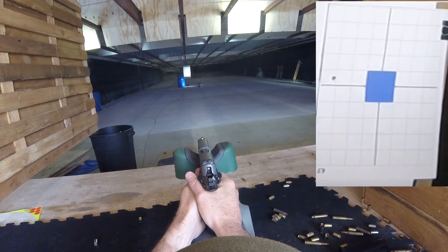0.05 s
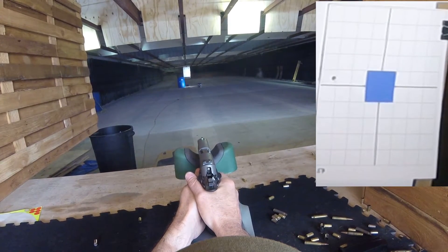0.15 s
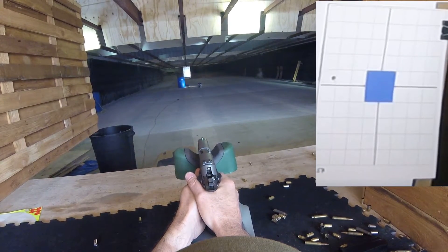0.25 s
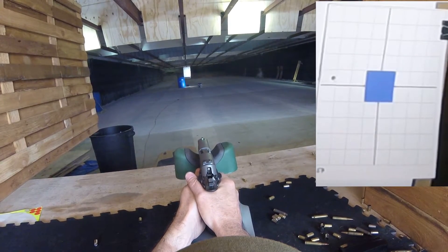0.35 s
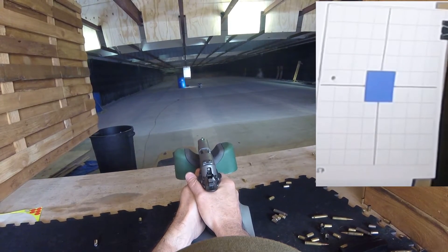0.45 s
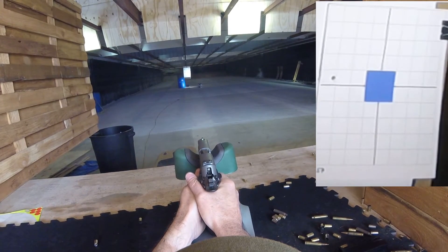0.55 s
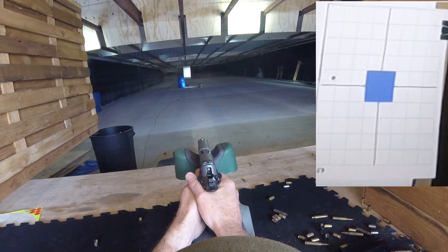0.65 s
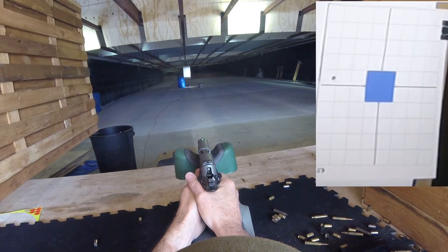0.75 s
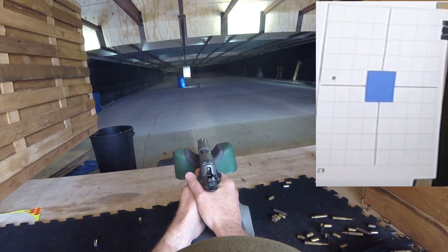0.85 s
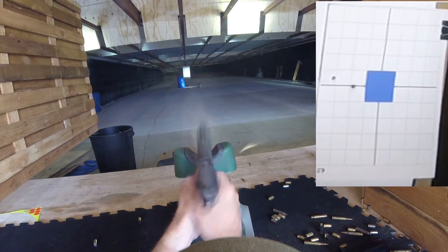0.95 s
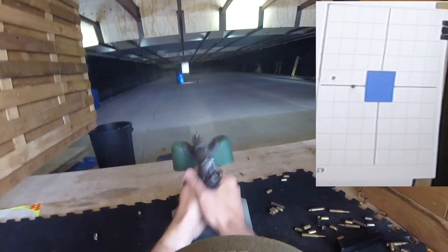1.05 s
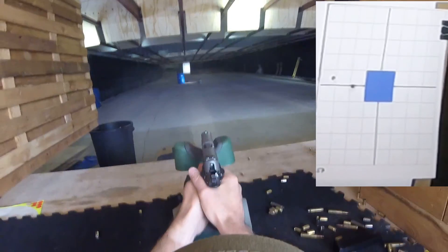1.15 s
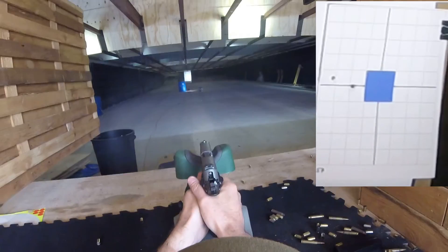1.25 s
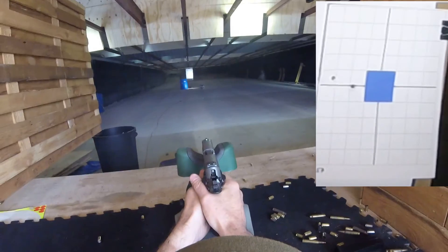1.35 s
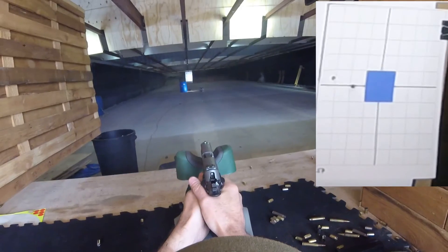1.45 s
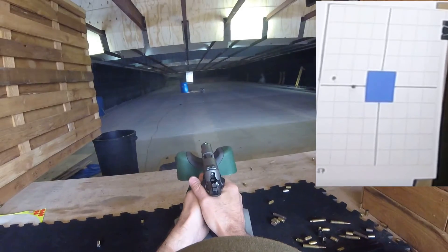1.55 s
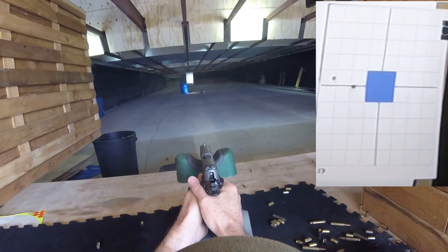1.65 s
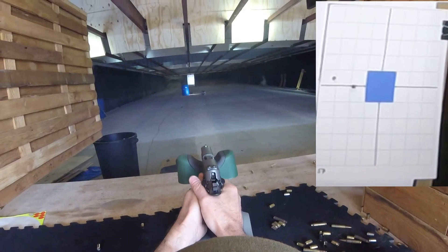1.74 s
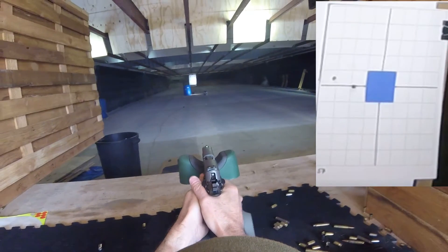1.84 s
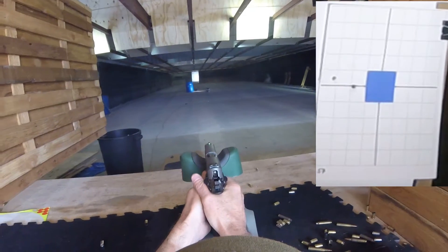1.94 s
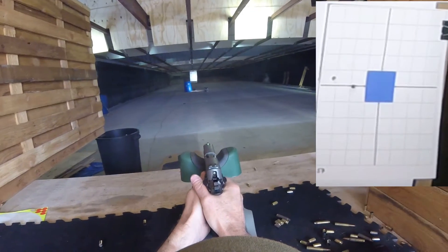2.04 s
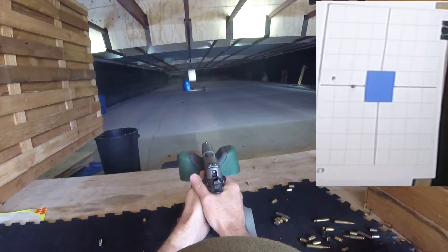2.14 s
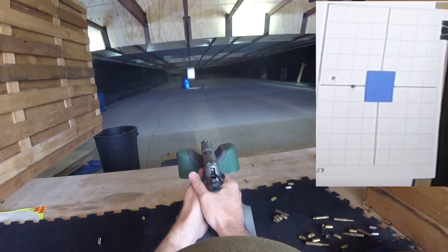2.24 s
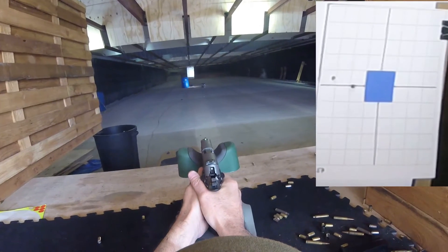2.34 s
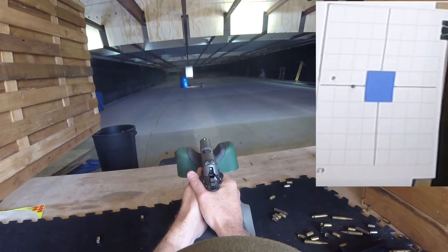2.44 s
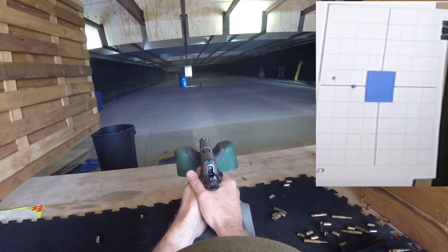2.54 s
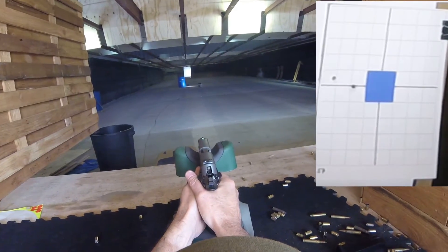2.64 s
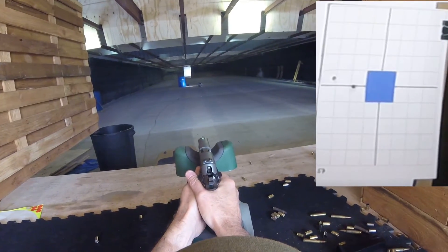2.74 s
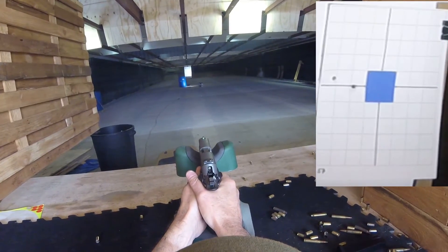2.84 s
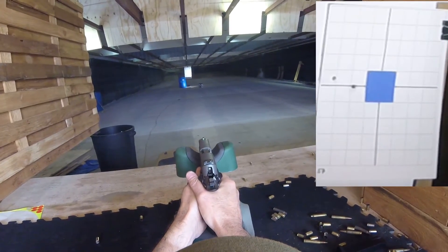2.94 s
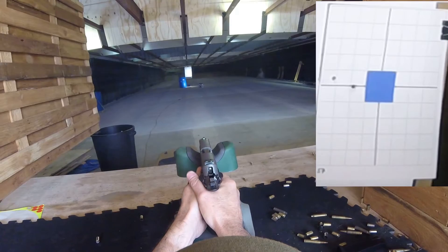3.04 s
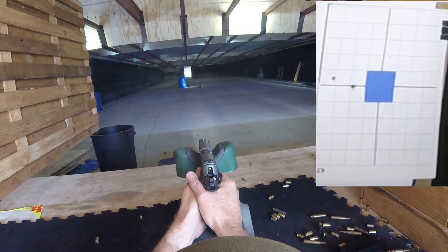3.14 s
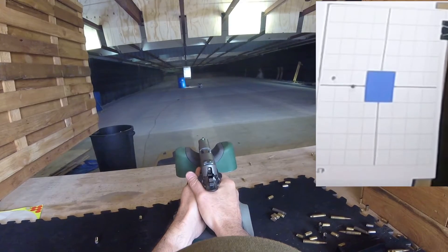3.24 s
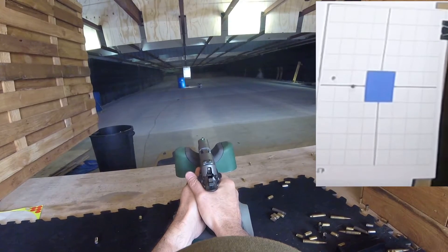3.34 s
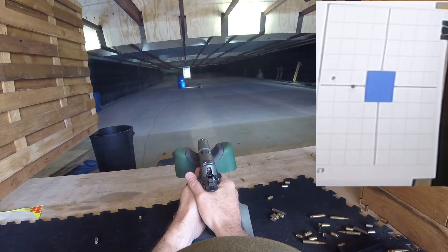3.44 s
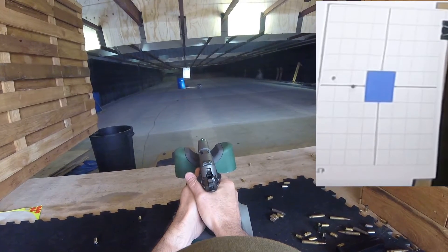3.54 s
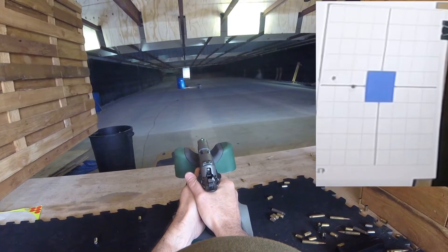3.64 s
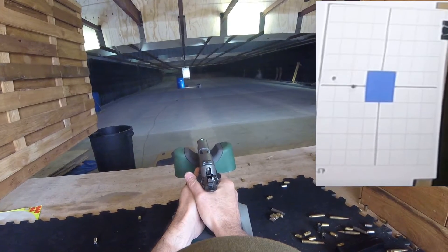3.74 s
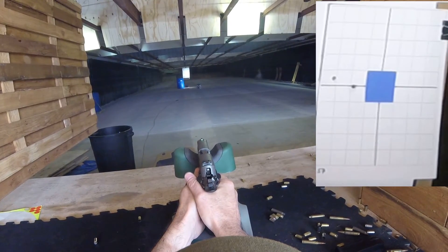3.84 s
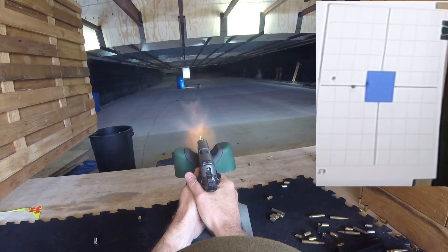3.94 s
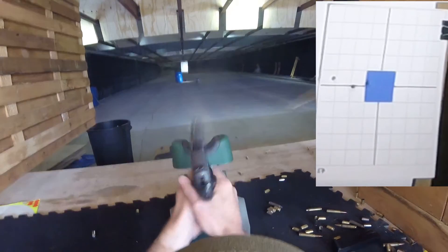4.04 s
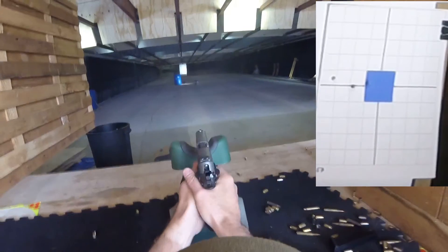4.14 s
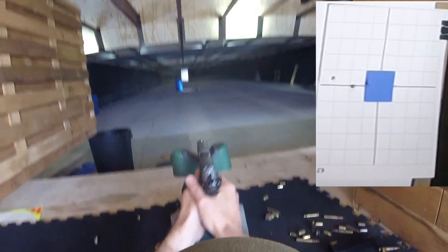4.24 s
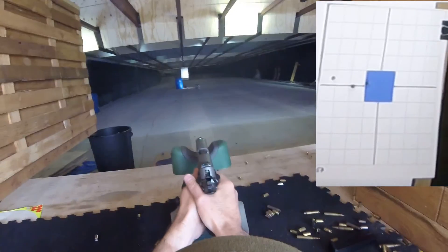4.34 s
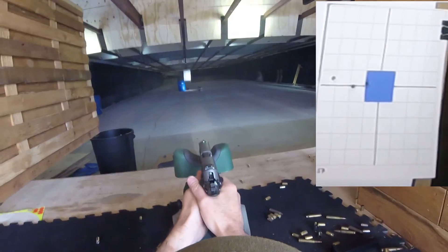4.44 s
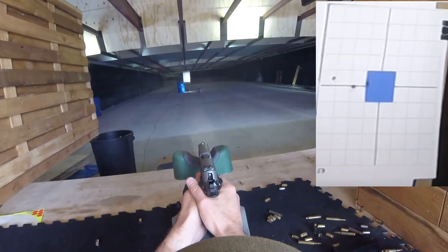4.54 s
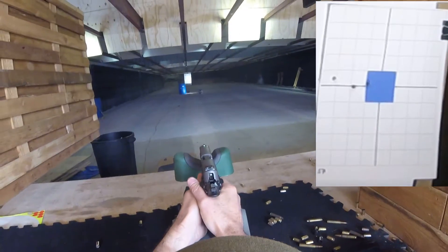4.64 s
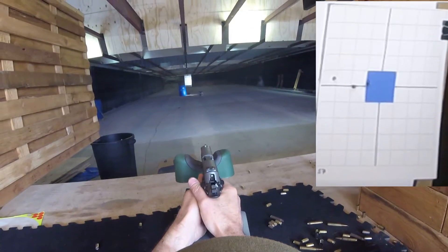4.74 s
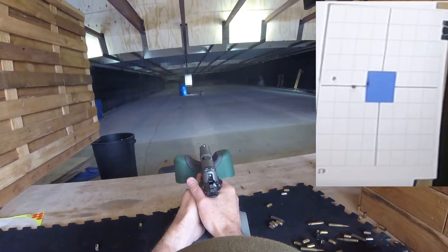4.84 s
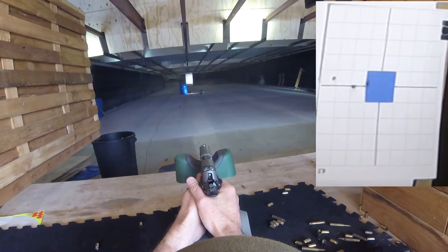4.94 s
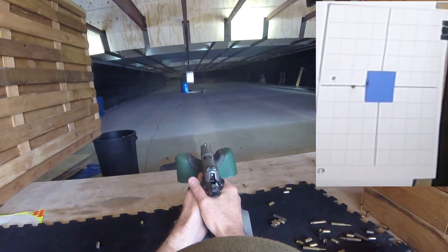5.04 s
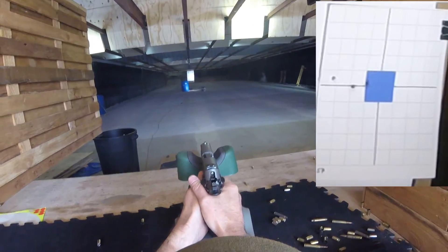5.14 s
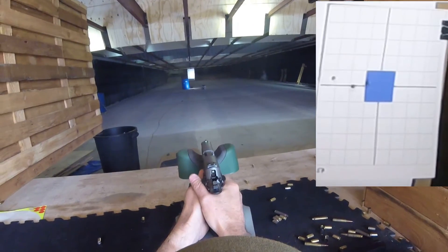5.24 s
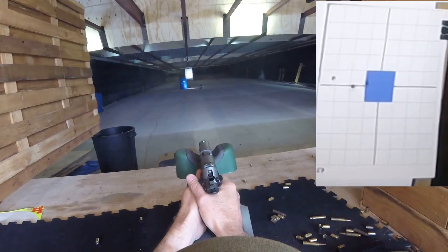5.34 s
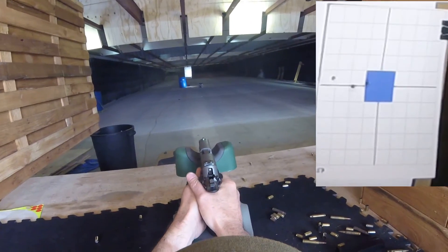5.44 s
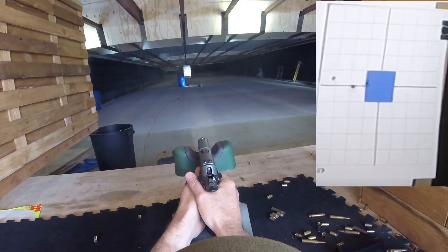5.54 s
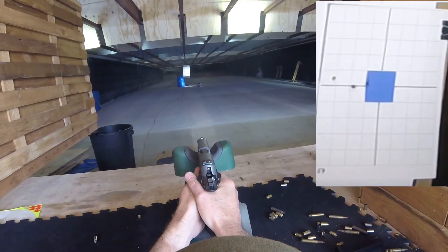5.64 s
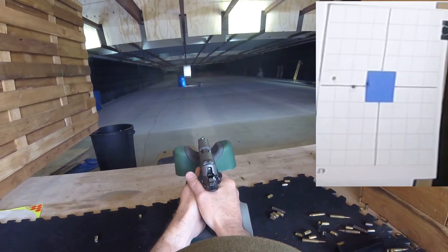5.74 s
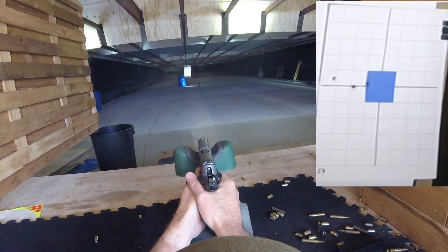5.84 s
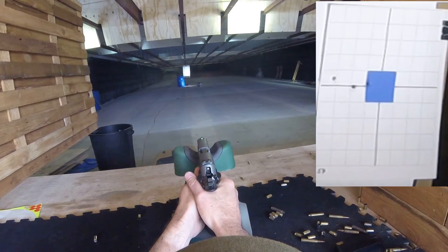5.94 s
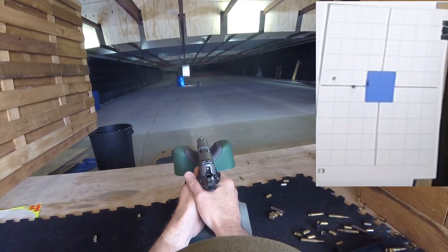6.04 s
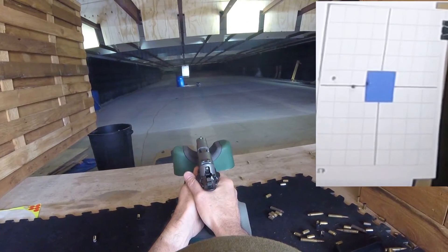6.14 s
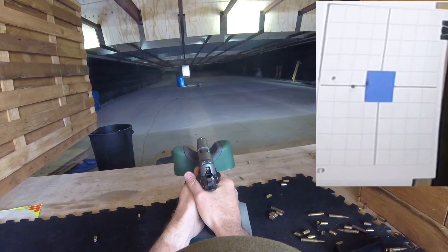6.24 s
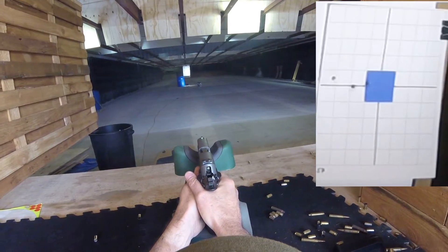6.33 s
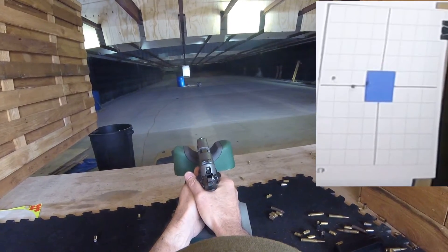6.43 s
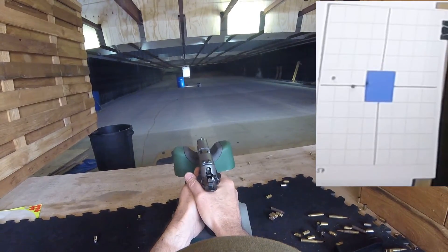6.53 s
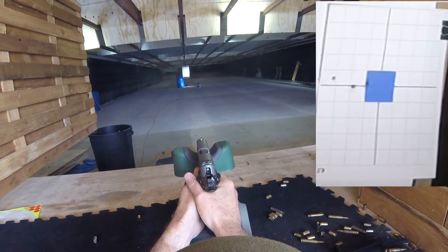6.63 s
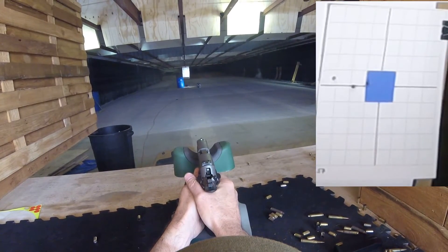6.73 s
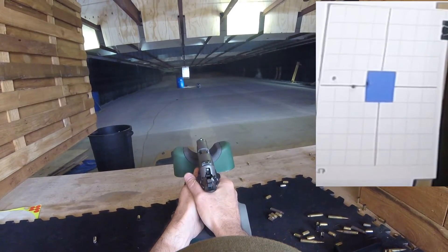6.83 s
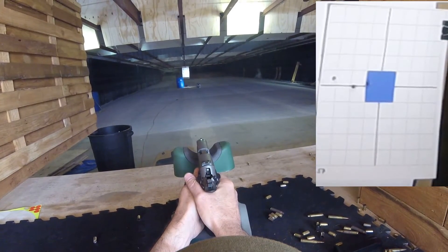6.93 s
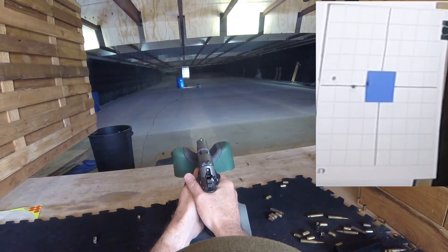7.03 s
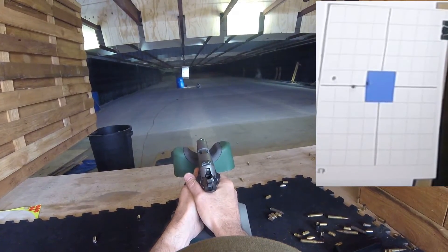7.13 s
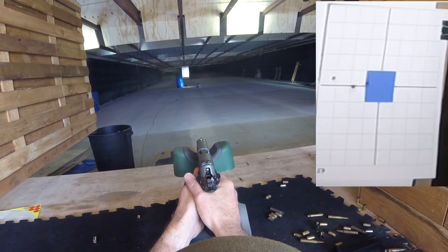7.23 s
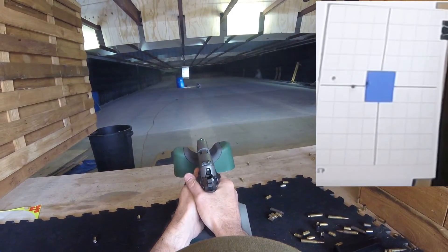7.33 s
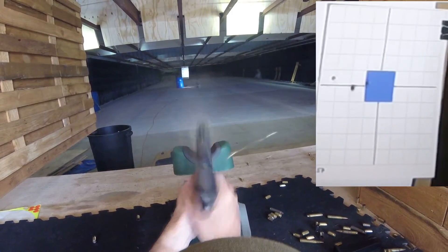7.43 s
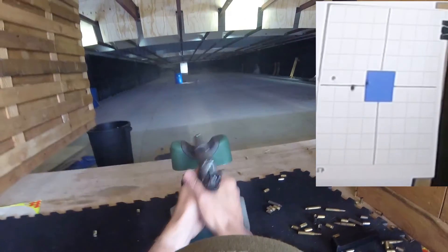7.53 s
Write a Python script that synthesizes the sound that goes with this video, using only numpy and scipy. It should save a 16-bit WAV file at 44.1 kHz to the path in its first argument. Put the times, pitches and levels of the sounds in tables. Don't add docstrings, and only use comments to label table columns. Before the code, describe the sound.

Three spaced pistol shots crack out under a covered range, each with a slide clack, backstop slap and long fading echo over faint wind.

```python
import sys
import numpy as np
from scipy import signal
from scipy.fft import rfft, irfft, next_fast_len
from scipy.io import wavfile
from scipy.ndimage import uniform_filter1d, minimum_filter1d

SR = 44100
rng = np.random.default_rng(int(sys.argv[2]) if len(sys.argv) > 2 else 0)


def gain_from_db(level_db):
    decades = np.asarray(level_db, float) / 20
    return 10 ** decades


def inscribe(sig):
    pcm = np.round(np.clip(np.atleast_2d(sig).T, -1, 1) * 32767)
    wavfile.write(sys.argv[1], SR, pcm.astype(np.int16))


N = 334278

# (time [s], level [dB])
SHOTS = [
    (0.971, -11),
    (4.0112, -11.5),
    (7.4413, -11),
]
# (time [s], fade [s])
MUTES = [
    (.928, .001),
    (3.969, .004),
    (7.393, .008),
]
BANDS_HZ = 25 * 2 ** np.arange(0, 9.3, 1 / 3)
PORT_HZ = 6520


def read(table, hz):
    f, v = np.transpose(table)
    return np.interp(np.log(hz), np.log(f), v)


def bands(x):
    size = next_fast_len(x.shape[-1])
    place = 3 * np.log2(np.maximum(np.fft.rfftfreq(size, 1 / SR), 1) / BANDS_HZ[0])
    spectrum = rfft(x, size)
    for k, hz in enumerate(BANDS_HZ):
        weight = np.cos(np.pi / 2 * np.clip(place - k, -1, 1)) ** 2
        yield hz, irfft(spectrum * weight, size)[..., :x.shape[-1]]


def fade(t, t60):
    return (t >= 0) * gain_from_db(-60 * np.clip(t, 0, 9) / t60)


def peak(x, hz, width_hz):
    return signal.lfilter(*signal.iirpeak(hz, hz / width_hz, SR), x)


def walk(rate):
    points = rng.standard_normal(int(N / SR * 400))[:int(N / SR * rate) + 2]
    return 1.2 * np.interp(np.arange(N) * rate / SR, np.arange(len(points)), points)


def add(out, x, s):
    i = int(s * SR)
    out[i:i + len(x)] += x[:len(out) - i]


def shots():
    same_paths = .95
    out, size = np.zeros(N), next_fast_len(int(2.9 * SR))
    common = same_paths * rng.standard_normal((2, 1, size))
    own = np.sqrt(1 - same_paths ** 2) * rng.standard_normal((2, len(SHOTS), size))
    near, far = common + own
    for (s, db), first, late in zip(SHOTS, near, hall(far)):
        add(out, gain_from_db(db) * blast(first[:SR // 2]), s)
        add(out, late, s)
        add(out, slide(), s)
        add(out, slaps(), s)
    return 0.64 * np.tanh(out / 0.83)


def blast(paths):
    # (frequency [Hz], level [dB per Hz])
    blast_colour = [(40, -6.5), (110, -11.5), (200, -9), (320, -11), (550, -11), (760, -2.5), (990, -12),
                    (1330, -8), (1720, -19), (2150, -13.5), (3900, -14.5), (6500, -18.5), (9500, -28),
                    (13300, -40)]
    # (frequency [Hz], t60 [s])
    bay_t60 = [(40, 0.12), (150, 0.18), (400, 0.29), (800, 0.18), (2000, 0.14), (5000, 0.076),
               (9000, 0.075), (13000, 0.0088)]
    # (frequency [Hz], level [dB], t60 [s], delay [s])
    bench_ring = [(736.3, -2.5, 0.12, .0095), (397, -5.5, 0.067, 0.005), (1608, -14, 0.14, .003),
                  (37.3, -9, 0.12, 0.0008), (217, -4.5, 0.068, .004)]
    # (delay [s], level [dB], low-pass [Hz], length [ms])
    baffles = [
        (0.116, -38, 90, 12),
        (0.147, -32.5, 120, 11),
        (0.257, -34, 70.4, 13),
    ]
    clamp_s, clamp_db = .0215, -5
    t = np.arange(len(paths)) / SR
    bay = sum(x * gain_from_db(read(blast_colour, hz)) * fade(t, read(bay_t60, hz)) for hz, x in bands(paths))
    bay /= np.sqrt(np.mean(bay[:SR // 50] ** 2))
    out = bay * np.minimum(t / 0.0014, 1)
    for hz, db, t60, late in bench_ring:
        out += gain_from_db(db) * fade(t - late, t60) * np.sin(2 * np.pi * hz * (t - late))
    for late, db, dull_hz, ms in baffles:
        pulse = bay[:SR // 20] * fade(t[:SR // 20], 0.016 * ms)
        front = signal.lfilter(*signal.butter(2, dull_hz, fs=SR), pulse)
        add(out, gain_from_db(db + 8.5) * front / np.abs(front).max(), late)
    return out * gain_from_db(clamp_db * np.clip((t - clamp_s) / 0.0014, 0, 1))


def slaps():
    # (delay [s], level [dB], frequency [Hz])
    surfaces = [
        (.3042, -22.5, 700),
        (.3095, -24, 820),
        (.3135, -21.5, 450),
        (.3250, -19, 470),
        (.346, -29, 230),
        (.640, -25, 580),
    ]
    cycles, rise_s = 8, .001
    out, t = np.zeros(SR), np.arange(SR // 20) / SR
    for late, db, hz in surfaces:
        thud = fade(t, cycles / hz) * np.minimum(t / rise_s, 1) * np.sin(2 * np.pi * hz * t)
        add(out, gain_from_db(db) * thud, late)
    return out


def hall(paths):
    # (frequency [Hz], bay level [dB], bay t60 [s], backstop level [dB], backstop t60 [s])
    two_waves = [(120, -11.5, .5, -29.5, 1.6), (248, -12.5, 0.61, -34, 1.49), (471, -15, .62, -31, 1.534),
                 (843, -20, 1.07, -35, 1.926), (1600, -20.5, .92, -39.5, 1.913),
                 (2680, -28, 1.16, -39, 1.627), (4020, -28, 1.21, -41, 1.585),
                 (6760, -24.5, 0.91, -38.5, 1.18)]
    # (frequency [Hz], level [dB per Hz])
    hall_colour = [(35, -42), (90, -27.5), (140, -11), (300, -3.5), (420, -4.5), (600, -4.5), (1670, -6.5),
                   (3700, -6), (5600, -16.5), (7500, -22), (9200, -33), (11000, -32), (14000, -46.5)]
    # (frequency [Hz], width [Hz], level [dB])
    roof_modes = [(660, 12, -4), (805, 14, -1), (838, 12, 0), (930, 25, -4), (968, 25, 0), (1010, 20, -1)]
    roof_db, roof_t60 = -43, 7.6
    backstop_s, rise_s = .307, .02
    second_trip_db = -4.5
    air_loss_db = 9
    grain_db, grain_s = 1, 1
    t = np.arange(paths.shape[1]) / SR
    centres, *columns = np.transpose(two_waves)
    first, second = [np.clip((t - trip * backstop_s) / rise_s, 0, 1) for trip in (1, 2)]
    answer = first + gain_from_db(2 * second_trip_db) * second
    roof = sum(gain_from_db(db) * peak(paths, hz, width) / np.sqrt(width) for hz, width, db in roof_modes)
    out = gain_from_db(roof_db) * roof / roof.std() * fade(t - backstop_s, roof_t60)
    for hz, x in bands(paths):
        bay_db, bay_t60, back_db, back_t60 = (np.interp(np.log(hz), np.log(centres), c) for c in columns)
        bay = gain_from_db(2 * bay_db) * fade(t, bay_t60 / 2)
        back = gain_from_db(2 * back_db) * fade(t - backstop_s, back_t60 / 2) * answer
        colour_db = read(hall_colour, hz) - air_loss_db * max(hz - PORT_HZ, 0) / 1000 * t
        out += x * np.sqrt(bay + back) * gain_from_db(colour_db) * np.sqrt(SR / 2)
    out *= gain_from_db(duck_db(t) + grain_db * np.exp(-t / grain_s) * walk(150)[:len(t)])
    return out * np.minimum(t / .02, 1) * np.clip((t[-1] - t) / 1.02, 0, 1)


def slide():
    stops_s = [
        .0005,
        .0098,
        .0335,
        .040,
    ]
    # (level [dB], centre [Hz], t60 [s])
    stop_sounds = [
        (-17, 4000, .012),
        (-17, 7000, .018),
        (-23, 3000, .022),
        (-20, 1500, .02),
    ]
    t = np.arange(SR // 10) / SR
    out = np.zeros(len(t))
    for late, (db, hz, t60) in zip(stops_s, stop_sounds):
        noise = peak(rng.standard_normal(len(t)), hz, hz) * np.sqrt(SR / np.pi / hz)
        out += gain_from_db(db) * fade(t - late, t60) * noise
    return signal.lfilter(*signal.butter(3, 7500, fs=SR), out)


def struck(times, dbs, modes, rise, rough_hz, crack_db):
    out, t = np.zeros(N), np.arange(SR // 2) / SR
    crack_band = signal.butter(4, (1800, 7000), "band", fs=SR, output="sos")
    for s, db in zip(times, dbs):
        crack = signal.sosfilt(crack_band, rng.standard_normal(len(t)))
        contact = fade(t, .012) + .45 * fade(t - .0042, .022) + .11 * fade(t, .12)
        hit = gain_from_db(crack_db) * crack * contact
        for hz, mode_db, t60 in modes:
            wobble = peak(rng.standard_normal(len(t)), hz, rough_hz) * np.sqrt(SR / np.pi / rough_hz)
            hit += gain_from_db(mode_db) * fade(t, t60) * (.7 * np.sin(2 * np.pi * hz * t) + .3 * wobble)
        add(out, gain_from_db(db) * hit * np.minimum(t / rise, 1), s)
    return out


def trigger_resets():
    # (time [s]), (level [dB])
    reset_s = [
        2.0573,
        5.1387,
        2.62,
        1.541,
    ]
    reset_db = [
        -29.5,
        -29,
        -49,
        -40,
    ]
    # (frequency [Hz], level [dB], t60 [s])
    trigger_modes = [(2450, 5, .013), (3300, -7, .008), (4300, -12, .008), (5300, -8, .01),
                     (6100, -1, .014), (8300, -20, .01), (9600, -30, .06), (11300, -30, .06)]
    return struck(reset_s, reset_db, trigger_modes, .001, 500, crack_db=-3)


def case_tinkles():
    # (time [s]), (level [dB])
    case_s = [
        1.03,
        1.42,
        1.545,
        4.06,
        4.59,
        7.53,
    ]
    case_db = [
        -62,
        -47,
        -54,
        -57.5,
        -63,
        -61,
    ]
    # (frequency [Hz], level [dB], t60 [s])
    brass_modes = [(10360, -7.5, 0.3), (10760, -8, .22), (11500, -20.5, .1)]
    return struck(case_s, case_db, brass_modes, 0.0091, 150, crack_db=-25)


def air():
    # (frequency [Hz], level [dB per Hz])
    air_colour = [(12, -29), (22, -1), (42, -8), (120, -21.5), (281, -32), (600, -38), (1130, -44),
                  (1500, -45.5), (2500, -46.5), (4900, -58.5), (6000, -56), (7500, -47), (10000, -58.5),
                  (13500, -56.5)]
    # (time [s], level on the rumble [dB])
    gusts = [
        (0.0, 1),
        (0.92, 1.5),
        (2.6, 2),
        (3.96, 2.5),
        (5.7, 0),
        (7.39, 2.5),
    ]
    # (frequency [Hz], width [Hz], level [dB])
    whine = [(2566, 18, -78.5), (594, 6, -74), (835, 10, -81), (1520, 120, -80), (6520, 450, -76)]
    t = np.arange(N) / SR
    gust = np.interp(t, *np.transpose(gusts)) + 1.2 * walk(18)
    out = np.zeros((2, N))
    for hz, x in bands(rng.standard_normal(N)):
        level_db = read(air_colour, hz) + gust * min(60 / hz, 1) + .6 * walk(8)
        out[int(hz > 200)] += x * gain_from_db(level_db)
    out *= gain_from_db(-45) / out.sum(axis=0).std()
    for hz, width, db in whine:
        tone = peak(rng.standard_normal(N), hz, width) * np.sqrt(SR / np.pi / width)
        out[1] += gain_from_db(db + 1.3 * walk(5.3)) * tone
    return out


def duck_db(t):
    release_db_s, release_end_s, knee_s = 21, 0.85, 0.11
    creep_db, creep_s = -19.5, 1.233
    creep = creep_db * np.exp(-np.maximum(t, 0) / creep_s)
    return creep - release_db_s * knee_s * np.logaddexp(0, (release_end_s - t) / knee_s)


def gain():
    t, out = np.arange(N) / SR, np.ones((2, N))
    for (s, _), (mute, length) in zip(SHOTS, MUTES):
        rest = np.clip((mute + .018 - t) / .016, 0, 1)
        main_fade = np.clip(1 - (t - mute) / length, 0, 1)
        shut = [rest, np.maximum(main_fade, gain_from_db(-14) * rest)]
        out = np.where(t < s, out * np.maximum(shut, gain_from_db(-39)), gain_from_db(duck_db(t - s)))
    return out


def mute_tick():
    return -gain_from_db(-32.5) * fade(np.arange(N) / SR - MUTES[0][0], .02)


def drop_masked_treble(x):
    keep_floor_db, mask_db = -119.5, -33
    hz, _, z = signal.stft(x, SR, nperseg=512)
    power = np.abs(z) ** 2 * 2 * 512 / SR / 1.5
    middle = uniform_filter1d(power[(hz > 500) & (hz < 4000)].mean(axis=0), size=3)
    middle = minimum_filter1d(middle, size=4, origin=1)
    band = np.repeat(power[:-1].reshape(64, 4, -1).mean(axis=1), 4, axis=0)
    band = uniform_filter1d(band, size=4, axis=1, origin=1)
    keep_db = keep_floor_db + 1.6 * walk(7)[::256] + 6 * np.maximum(hz[:-1, None] / 1000 - 12.3, 0)
    bar = gain_from_db(2 * keep_db) + gain_from_db(2 * mask_db) * middle[:keep_db.shape[1]]
    z[:-1, :bar.shape[1]] *= (band[:, :bar.shape[1]] > bar) | (hz[:-1, None] < 3500)
    return signal.istft(z, SR)[1][:N]


def scene():
    mono = shots() + np.sum(gain() * air(), axis=0) + mute_tick()
    mono += trigger_resets() + case_tinkles()
    return np.array([mono, mono])


def low_pass(x):
    return signal.sosfilt(signal.butter(12, 14490, fs=SR, output="sos"), x)


def record(dry):
    port_width_hz, port_db, side_db = 330, 0, -7.5
    mono = drop_masked_treble(dry[0] + gain_from_db(port_db) * peak(dry[0], PORT_HZ, port_width_hz))
    mono = signal.sosfilt(signal.ellip(8, .2, 70, 13900, fs=SR, output="sos"), mono)
    treble = signal.sosfilt(signal.butter(3, 11000, "high", fs=SR, output="sos"), np.gradient(mono))
    side = gain_from_db(side_db) * walk(300) * treble
    return low_pass(np.array([mono + side, mono - side]))


dry = scene()
out = record(dry)
inscribe(out)
```